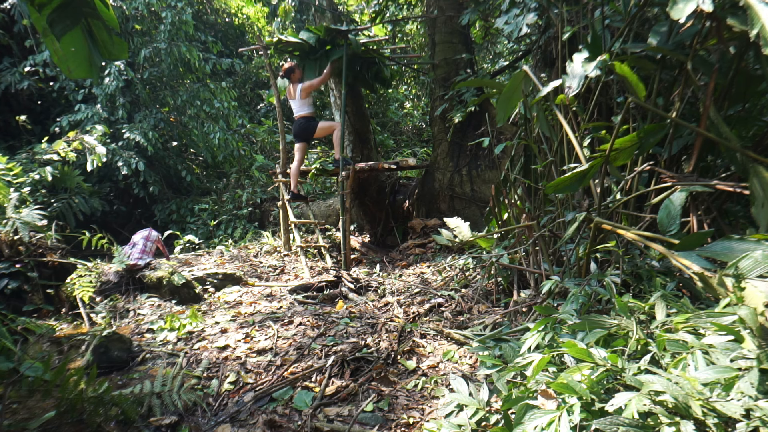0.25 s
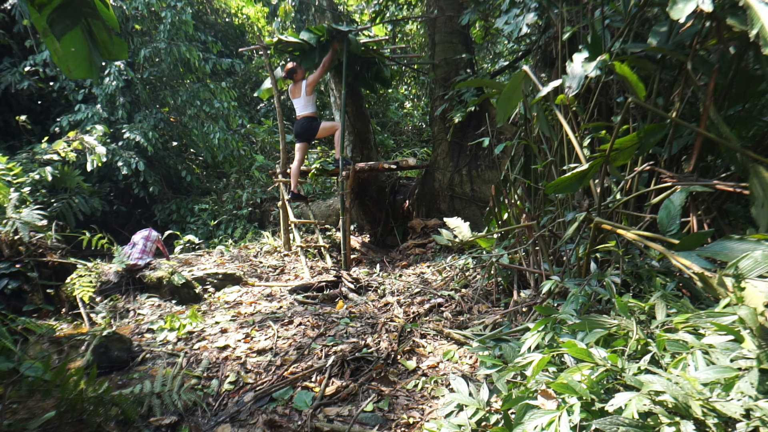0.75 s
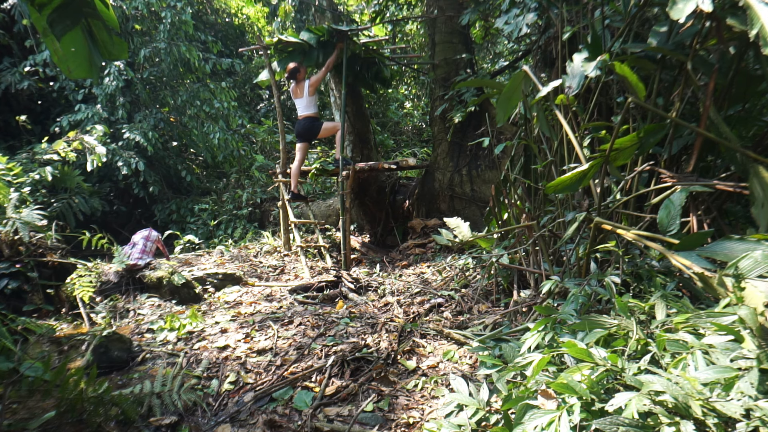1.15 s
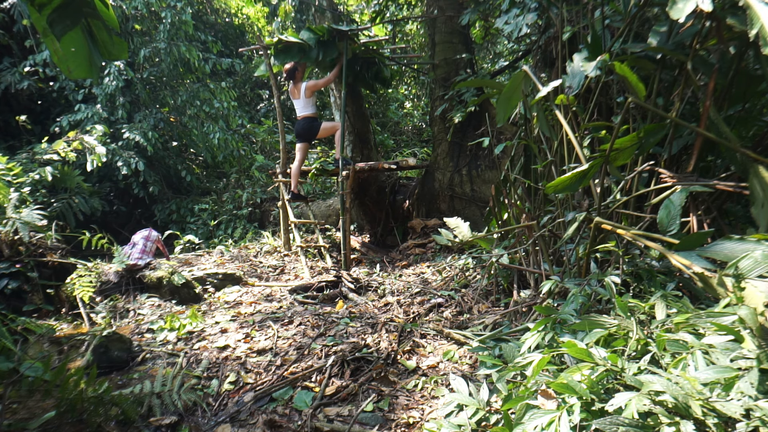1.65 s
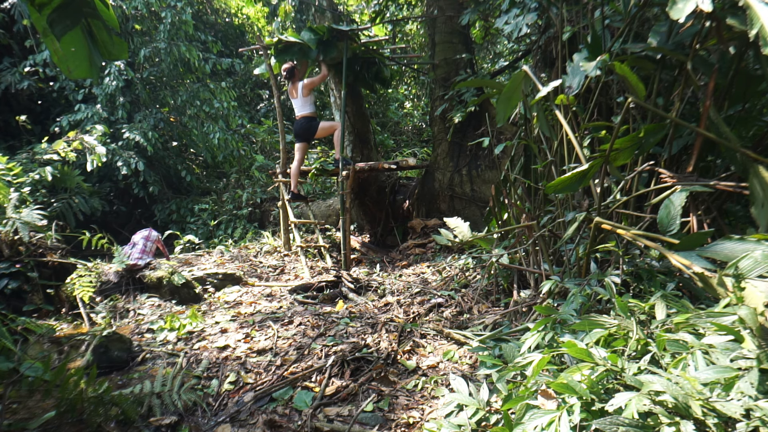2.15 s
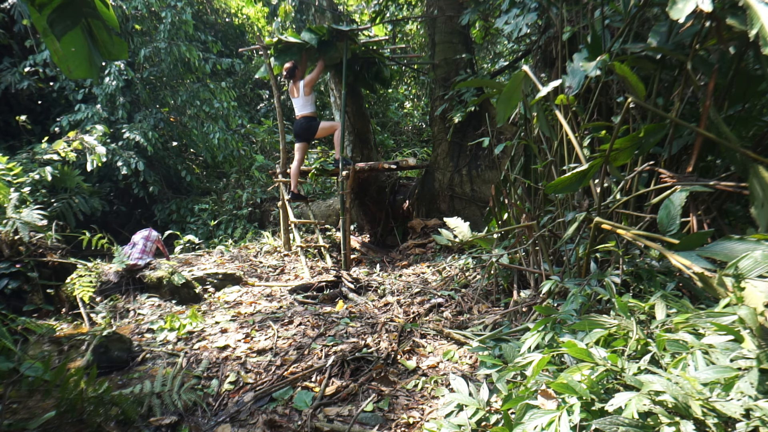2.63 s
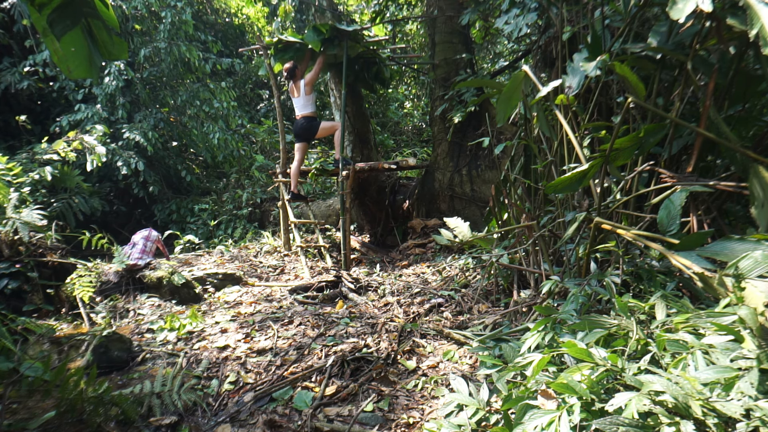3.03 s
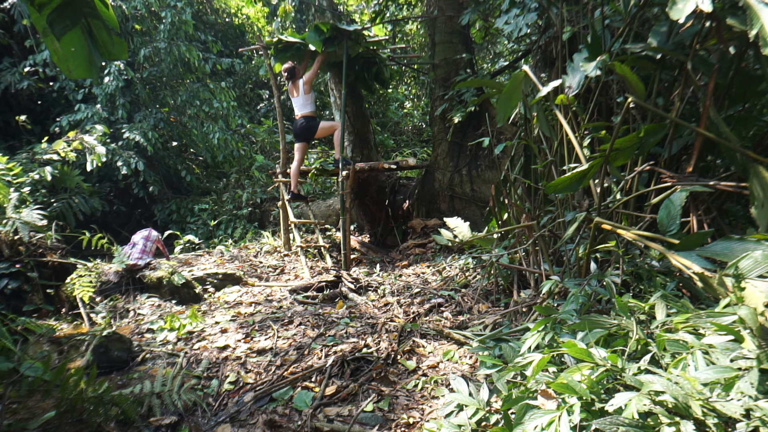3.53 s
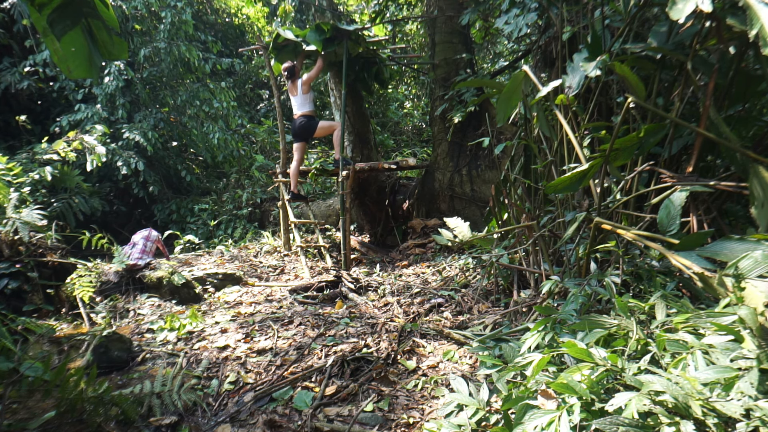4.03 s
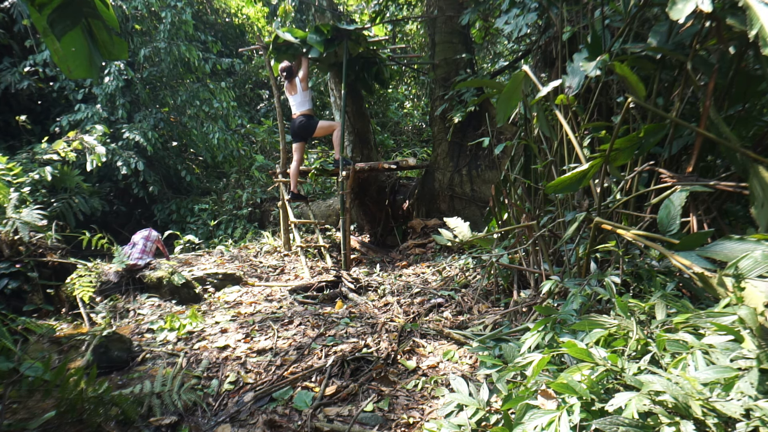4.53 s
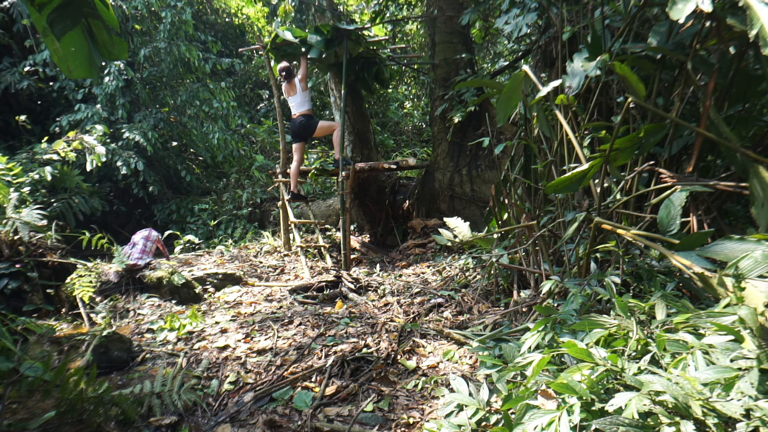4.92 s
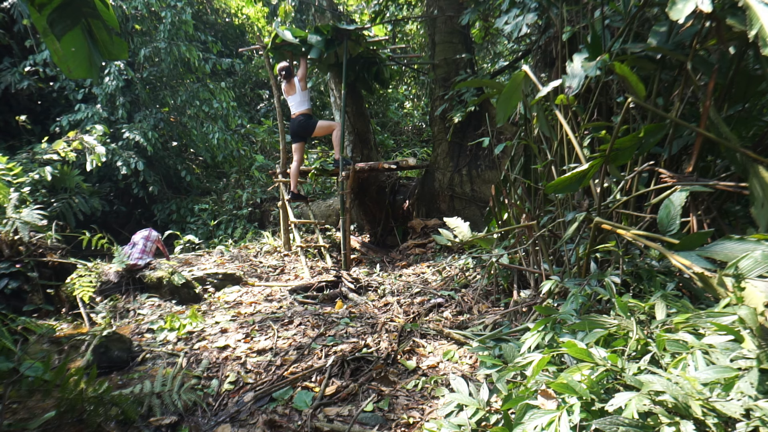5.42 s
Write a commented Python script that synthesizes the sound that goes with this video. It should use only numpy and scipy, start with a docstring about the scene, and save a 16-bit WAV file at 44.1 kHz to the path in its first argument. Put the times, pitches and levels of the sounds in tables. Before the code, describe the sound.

A small stream rushes softly and steadily throughout in a tropical forest clearing, dotted with little bubbling plops. Distant insects add a faint, very high hiss. From the start until about 1.6 seconds, a bird repeats short, high, rising chirps, about five a second, with a brief echo from the trees. A second, slightly higher bird calls from 2.4 to 4.1 seconds and again from 4.7 to 5.2. The first returns from 3 to 5.2 seconds, overlapping it. Meanwhile, leaf thatch is tugged in short bursts: light rustles at about 1.2 and 1.5 seconds, another just after 2, a louder crunching rustle from 2.8 to 3.1, and a quick one at 5. Tiny sharp snaps of leaf ribs accompany these pulls. The birds and other high sounds are stronger on the left. Water and insects continue to the end.

```python
"""A clearing in tropical forest. Distant insects merge into a steady hiss, and a small stream
rushes and plops as trapped air bubbles resonate. Someone on a ladder tugs at the leaf thatch
of a shelter: friction makes the leaves rustle, and their ribs snap. Two birds repeat short
rising chirps in runs, about five a second, and the trees scatter their calls."""
import sys
import numpy as np
from scipy import signal
from scipy.fft import rfft, irfft, next_fast_len
from scipy.io import wavfile
from scipy.ndimage import map_coordinates

SR = 44100
rng = np.random.default_rng(int(sys.argv[2]) if len(sys.argv) > 2 else 0)


def pcm_store(signal):
    """Save signal as 16-bit PCM."""
    levels = np.round(np.clip(np.atleast_2d(signal), -1, 1) * 32767)
    wavfile.write(sys.argv[1], SR, levels.astype(np.int16).T)


N = 250047


def amp(db):
    """Amplitude ratio of a level in decibels."""
    return 10 ** (np.asarray(db) / 20)


def unit_rms(x):
    """Normalisation to rms 1."""
    return x / np.sqrt(np.mean(x ** 2) + 1e-20)


def along(points, hz):
    """Interpolation of (f/Hz, value) points on a logarithmic frequency axis."""
    f, value = np.transpose(points)
    return np.interp(np.log(hz + 1), np.log(f + 1), value)


def seconds(length):
    """Uniform sample times over a duration."""
    return np.arange(int(length * SR)) / SR


def add(track, onset, sound):
    """Superposition: a sound joins the track at its onset in seconds."""
    start = round(onset * SR)
    lo, hi = max(start, 0), min(start + sound.shape[-1], N)
    if hi > lo:
        track[..., lo:hi] += sound[..., lo - start:hi - start]


def wobble(rate):
    """Random modulation: a smooth curve with rate knots a second."""
    return map_coordinates(rng.standard_normal(int(N * rate / SR) + 4), [np.arange(N) * rate / SR])


def filtered(x, response):
    """Linear filtering: the spectrum is multiplied by a frequency response."""
    size = next_fast_len(N + 8192)
    return irfft(rfft(x, size) * response(np.fft.rfftfreq(size, 1 / SR)), size)[..., :N]


# Likeness of the sound at the two ears: f/Hz, correlation coefficient
COHERENCE = [(60, .35), (130, 0.72), (500, 0.88), (1000, 0.83), (2000, 0.93), (4000, 0.25), (8000, 0.31),
             (15000, 0.18)]
def diffuse_noise(spectrum, envelope=1):
    """Partial coherence: coloured noise reaches both ears, most alike in the mid range."""
    def response(hz):
        angle = np.arccos(np.clip(along(COHERENCE, hz), -1, 1)) / 2
        return spectrum(hz) * np.array([np.cos(angle), np.sin(angle)])
    mid, side = filtered(envelope * rng.standard_normal((2, N)), response)
    return np.array([mid + side, mid - side])


# Bands of the insect choruses: f/Hz, bandwidth/Hz, level/dB
CHORUS_BANDS = [(9420, 1500, 2), (10780, 240, 3.5)]
def insects(level_db, waver_db):
    """Incoherent summation: distant choruses merge into narrow bands of hiss."""
    bands = lambda f: sum(amp(db) / (1 + (2 * (f - hz) / width) ** 2) for hz, width, db in CHORUS_BANDS)
    return unit_rms(diffuse_noise(bands)) * amp(level_db + waver_db * wobble(3.41))


def bubble(hz, t60, rise=0.11, attack_s=0.001):
    """Damped oscillation: trapped air rings, and sharpens a little as it nears the surface."""
    t = seconds(.1)
    envelope = amp(-60 * t / t60) * (1 - np.exp(-t / attack_s))
    return envelope * np.sin(2 * np.pi * hz * t * (1 + rise * t / t60 / 2))


# Spectrum of the rushing water: f/Hz, level/dB
RUSH_SPECTRUM = [(15, -34), (50, -33), (90, -31), (140, -26), (220, -14.5), (380, -6), (490, -5), (700, -2),
                 (1300, -2), (2000, -0.95), (3300, -5), (5200, -9), (7500, -12), (11000, -14), (12500, -17),
                 (15500, -19)]
# The biggest bubbles: t/s, level/dB, f/Hz
BIG_BUBBLES = [(0.299, -34.5, 983), (0.434, -34, 972), (1.147, -32.5, 1264), (1.422, -30, 2320),
               (1.427, -31.5, 966), (1.476, -33.5, 1210), (2.118, -31.5, 1204), (2.231, -34.5, 925),
               (2.883, -32.5, 1080), (2.936, -28, 1890), (3.165, -28.5, 1390), (3.819, -30, 1490),
               (4.264, -27, 1200), (4.89, -31, 710), (5.508, -31, 2230)]
def stream(rush_db, flutter_db, count, babble_db, range_db, babble_hz, octaves, cycles,
           plop_db, plop_cycles):
    """Bubble resonance over a broadband rush: at constant Q, the lower a bubble, the longer it rings."""
    rush = unit_rms(diffuse_noise(lambda hz: amp(along(RUSH_SPECTRUM, hz))))
    bubbles = np.zeros(N)
    for when, height, strength in rng.random((count, 3)):
        hz = babble_hz * 2 ** (octaves * (2 * height - 1))
        gain = amp(babble_db + range_db * strength ** 2)  # most bubbles are faint
        add(bubbles, when * N / SR, gain * bubble(hz, t60=cycles / hz))
    for onset, db, hz in BIG_BUBBLES:
        add(bubbles, onset, amp(db + plop_db) * bubble(hz, t60=plop_cycles / hz))
    return rush * amp(rush_db + flutter_db * wobble(8)) + bubbles


# Tugs at the thatch: t/s, rise time/s, hiss level/dB, crunch level/dB
THATCH_TUGS = [(1.243, .02, -38, -59), (1.521, .048, -38.5, -58), (2.08, 0.044, -41, -55),
               (2.17, .02, -38.5, -45), (2.84, 0.061, -30, -43), (2.925, 0.054, -32, -37.5),
               (3.005, 0.025, -39, -52), (5.033, 0.0055, -32.5, -42)]
# Spectra of sliding leaves and of crushed fronds: f/Hz, level/dB
SLIDE_SPECTRUM = [(200, -46), (600, 3), (1500, -11), (3000, -4.5), (6000, -2.5), (10000, -0.5),
                  (15500, -2.5)]
CRUSH_SPECTRUM = [(150, -20), (500, -10), (1500, 7), (3000, 11.5), (6000, 5), (15000, -28)]
def thatch_rustle(level_db, crackle_db, settle_t60):
    """Friction noise: dry leaves crackle as they slide, crunch when pulled hard and come to rest."""
    force = np.zeros((2, N))
    t = seconds(.4)
    for onset, rise, hiss_db, crunch_db in THATCH_TUGS:
        stroke = np.minimum(t / rise, 1) * amp(-60 * np.maximum(t - rise, 0) / settle_t60)
        add(force, onset, amp([[hiss_db], [crunch_db]]) * stroke)
    crackle = unit_rms(amp(crackle_db * wobble(600)))
    slide, crush = amp(level_db) * force * crackle
    hiss = diffuse_noise(lambda hz: amp(along(SLIDE_SPECTRUM, hz)), slide)
    crunch = diffuse_noise(lambda hz: amp(along(CRUSH_SPECTRUM, hz)), crush)
    return hiss + crunch


# Leaf ribs that break: t/s, level/dB, f/Hz
RIB_BREAKS = [(1.4217, -28.5, 10000), (2.1695, -28.5, 10010), (2.1884, -31, 10100), (2.8834, -32, 8090),
              (3.022, -30, 10600), (3.1203, -28.5, 6870), (5.037, -27, 8580)]
def rib_snaps(level_db, t60, width_hz, attack_s=0.0003):
    """Transient excitation: each snapping rib sounds one broad, quickly damped resonance."""
    snaps = np.zeros((2, N))
    t = seconds(.4)
    envelope = amp(-60 * t / t60) * (1 - np.exp(-t / attack_s))
    for onset, db, hz in RIB_BREAKS:
        resonance = signal.iirpeak(hz, hz / width_hz, SR)
        band = signal.lfilter(*resonance, rng.standard_normal((2, len(t))))
        crack = unit_rms(signal.lfilter(*resonance, band))
        add(snaps, onset, amp(db + level_db) * crack * envelope)
    return snaps


def trees(call, wet_db, t60=.53, build_s=0.024, coherence=0.29):
    """Multiple scattering: trunks and leaves add a tail to the direct call, on new paths each time."""
    t = seconds(.5)
    paths = rng.standard_normal((3, len(t))) * amp(-60 * t / t60) * (1 - np.exp(-t / build_s))
    paths /= np.linalg.norm(paths[0])
    response = amp(wet_db) * (np.sqrt(coherence) * paths[0] + np.sqrt(1 - coherence) * paths[1:])
    response[:, 0] += 1  # direct sound
    return signal.fftconvolve(call[None], response, axes=1)


def phrases(runs, pace, sag_hz_per_s, hurry_db):
    """Pulse trains of (t/s, level/dB, offset/Hz): pitch sags; level gains hurry_db per doubled pace."""
    clock, periods = np.transpose(pace)
    chirps = []
    for start, end, db, offset_hz, lift_hz in runs:
        onset, period = start, np.interp(start, clock, periods)
        while onset < end:
            effort_db = hurry_db * np.log2(np.median(periods) / period)
            shift_hz = offset_hz + lift_hz * (onset == start) - sag_hz_per_s * (onset - start)
            chirps.append((onset, db + effort_db, shift_hz))
            period = np.interp(onset, clock, periods)
            onset += period
    return chirps


def bird(chirps, pips, level_db, wet_db, slide_hz, jitter_hz, uneven_db):
    """Frequency modulation: a chirp climbs through gliding pips that vary from call to call."""
    song = np.zeros((2, N))
    lead_in = .05
    t = seconds(.12) - lead_in
    for onset, db, offset_hz in chirps:
        call = np.zeros(len(t))
        for centre, length, hz, pip_db in pips:
            detune, strength, phase = rng.standard_normal(3)
            position = np.clip((t - centre) / length, -.5, .5)
            pitch = hz + offset_hz + jitter_hz * detune + slide_hz * position
            envelope = amp(db + level_db + pip_db + uneven_db * strength) * np.cos(np.pi * position) ** 2
            call += envelope * np.sin(2 * np.pi * (np.cumsum(pitch) / SR + phase))
        add(song, onset - lead_in, trees(call, wet_db))
    return song


# Pips of one chirp: t/s from its swell, duration/s, f/Hz, level/dB
LOW_BIRD_PIPS = [(-.031, 0.015, 4030, -14), (-.02, 0.016, 4120, -10.5), (-.011, 0.013, 4270, -4.5),
                 (-.002, 0.01, 4236, -5.5), (.005, 0.01, 4350, -2.5), (0.018, 0.021, 4450, -13.5),
                 (0.028, 0.025, 4490, -15.5)]
HIGH_BIRD_PIPS = [(-.018, 0.016, 4093, -6), (-.008, 0.01, 4220, -6.5), (0, .012, 4336, -1.5),
                  (.015, 0.014, 4476, -4), (.025, .015, 4650, -5), (.038, 0.02, 4700, -10.5)]
# Runs of chirps: start t/s, end t/s, level/dB, pitch offset/Hz, lift of the opening chirp/Hz
LOW_BIRD_RUNS = [(.002, 1.6, -24.5, 6.2, 120), (3.025, 5.19, -25, 16.8, 0.5)]
HIGH_BIRD_RUNS = [(2.362, 4.08, -24, 12, 75), (4.65, 5.16, -26, -48.5, 126.5)]
# Pace of the chirps: t/s, period/s
LOW_BIRD_PACE = [(0, .18), (.9, .186), (1.1, .2), (3.0, .203), (4.0, .182), (4.55, .181), (4.9, .19)]
HIGH_BIRD_PACE = [(2.36, .235), (2.6, .201), (3.2, .2), (3.8, .191), (4.65, .205)]
def two_birds():
    """Independent sources: two birds, one slightly higher, each keep their own pace."""
    low_chirps = phrases(LOW_BIRD_RUNS, LOW_BIRD_PACE, sag_hz_per_s=11.0, hurry_db=23)
    high_chirps = phrases(HIGH_BIRD_RUNS, HIGH_BIRD_PACE, sag_hz_per_s=30.8, hurry_db=2.5)
    low = bird(low_chirps, LOW_BIRD_PIPS, level_db=-1.57, wet_db=-2.0,
               slide_hz=-89.5, jitter_hz=18.34, uneven_db=1.5)
    high = bird(high_chirps, HIGH_BIRD_PIPS, level_db=-5.5, wet_db=.5,
                slide_hz=60.4, jitter_hz=22.05, uneven_db=1.0)
    return low + high


def scene():
    """Linear superposition: the pressures of insects, stream, thatch and birds add."""
    water = stream(rush_db=-41.5, flutter_db=0.48, count=260, babble_db=-49, range_db=15,
                   babble_hz=1454, octaves=0.95, cycles=37, plop_db=2.5, plop_cycles=47)
    birds = two_birds()
    snaps = rib_snaps(level_db=-4.5, t60=0.016, width_hz=6200)
    rustle = thatch_rustle(level_db=-3.5, crackle_db=3.1, settle_t60=0.29)
    return insects(level_db=-58, waver_db=2.0) + water + rustle + snaps + birds


# Left microphone relative to right: f/Hz, level/dB
LEFT_LEVEL = [(60, -1.0), (110, 1), (200, 1.5), (380, 1.5), (700, 1), (1290, 4.5), (2380, 5), (4400, 9.5),
              (8120, 9.5), (15000, 9.5)]
# Phase of left relative to right: f/Hz, phase/rad
LEFT_PHASE = [(60, -.1), (130, -0.082), (290, -1.25), (600, -1.725), (2500, -1.47), (4400, -1.83),
              (10000, -1.6)]
def record(dry, cutoff_hz=15830):
    """Channel imbalance: the band-limited microphone pair is duller on the right and out of phase."""
    left = lambda hz: amp(along(LEFT_LEVEL, hz) / 2) * np.exp(1j * along(LEFT_PHASE, hz) / 2)
    return filtered(dry, lambda hz: np.array([left(hz), 1 / left(hz)]) * (hz < cutoff_hz))


dry = scene()
out = record(dry)
pcm_store(out)
```